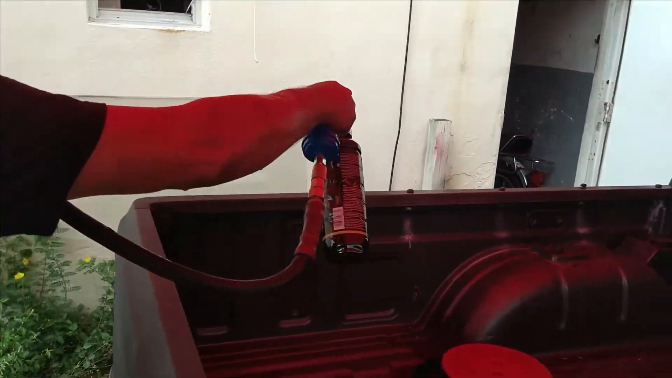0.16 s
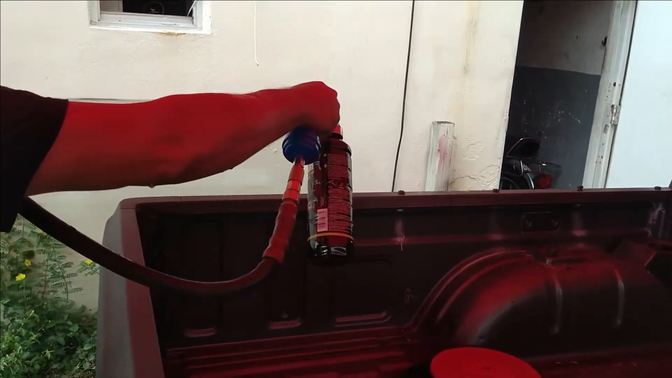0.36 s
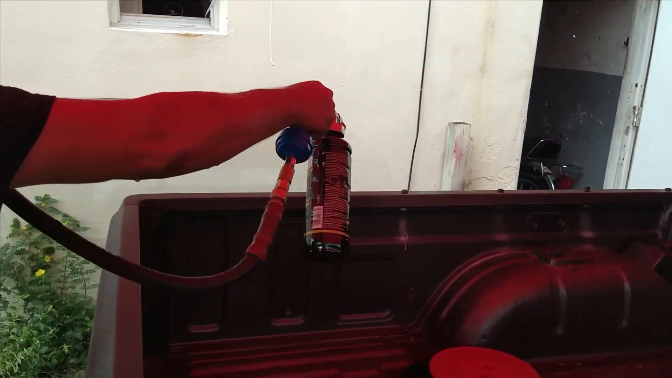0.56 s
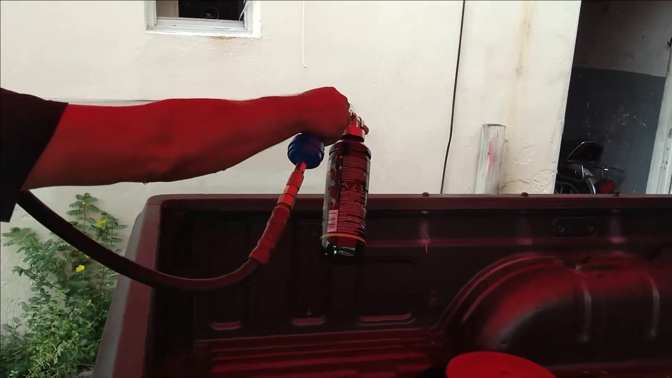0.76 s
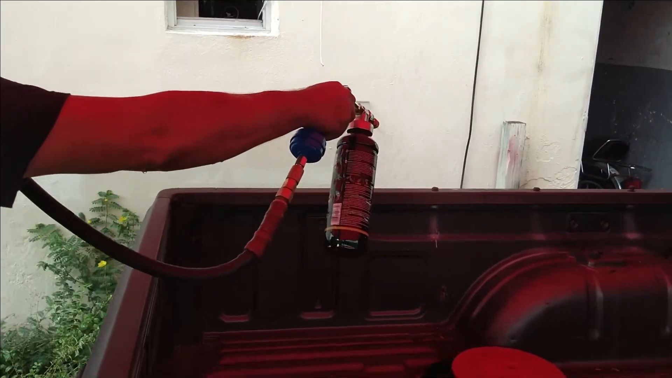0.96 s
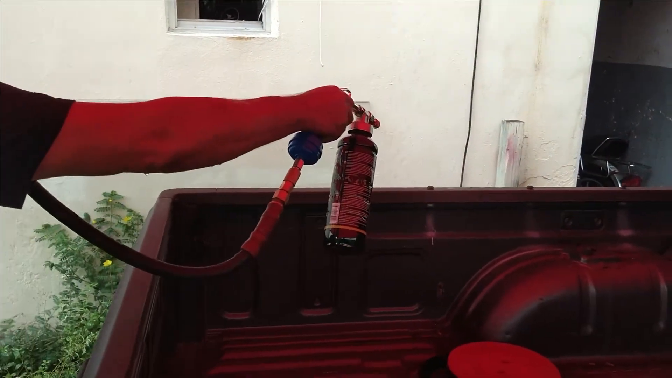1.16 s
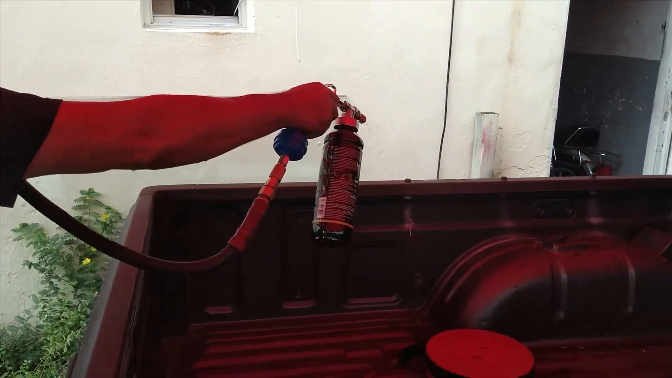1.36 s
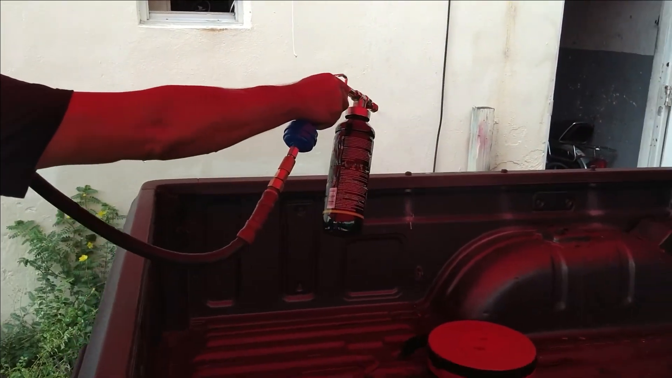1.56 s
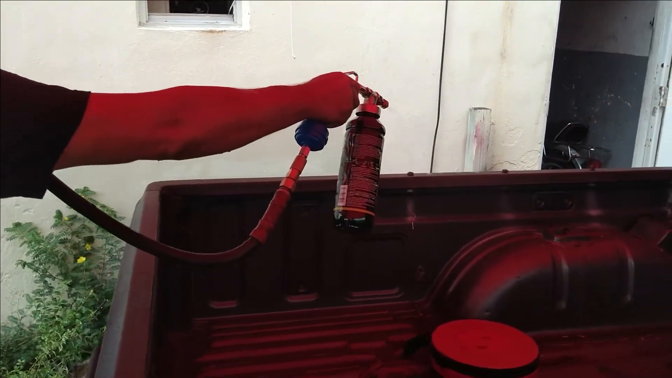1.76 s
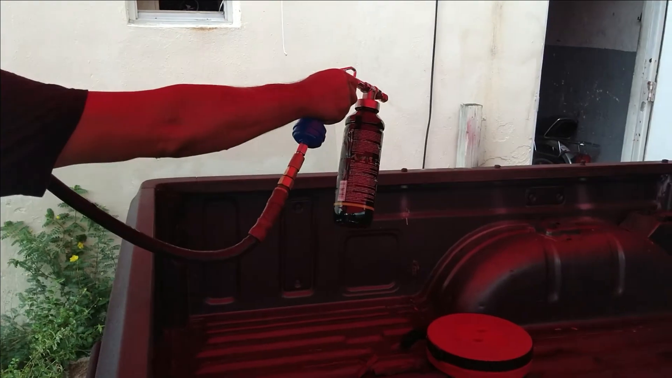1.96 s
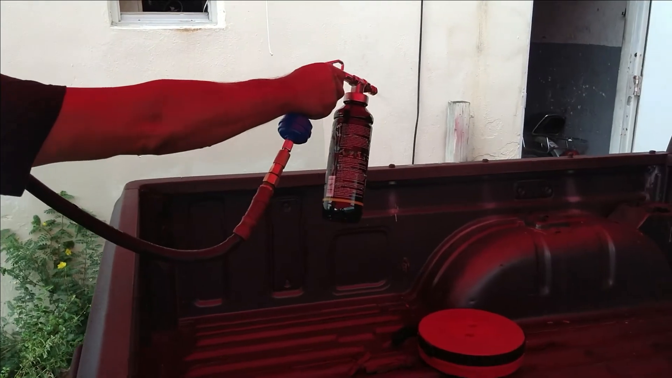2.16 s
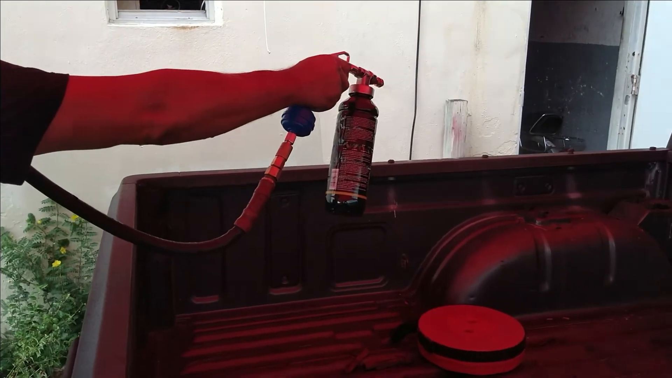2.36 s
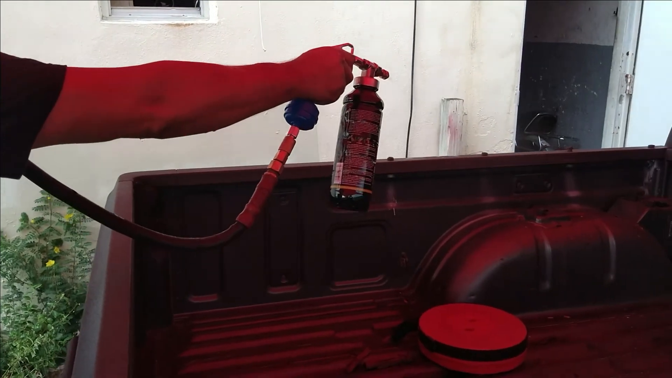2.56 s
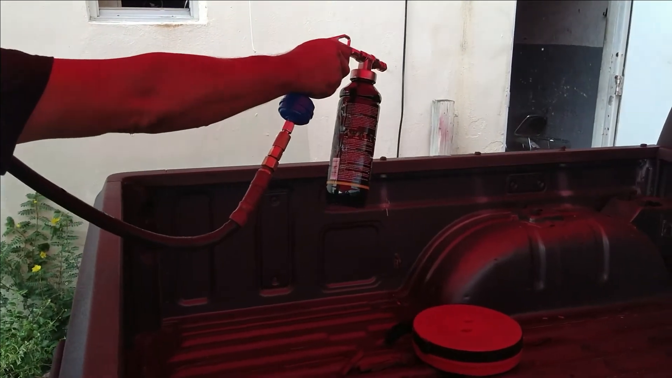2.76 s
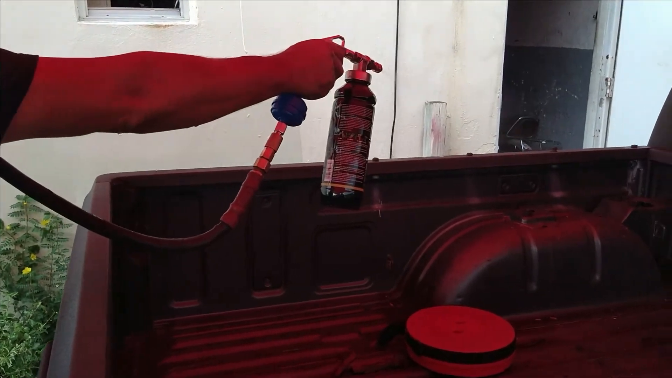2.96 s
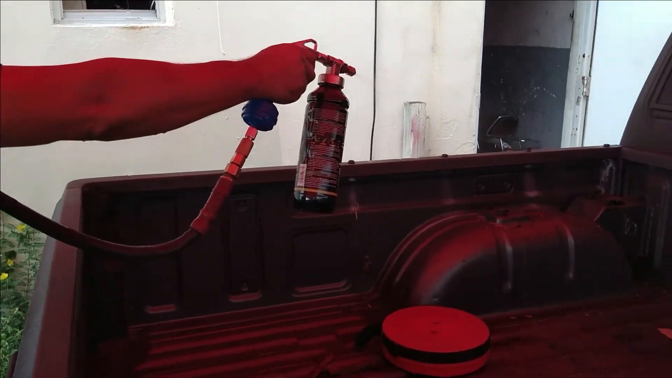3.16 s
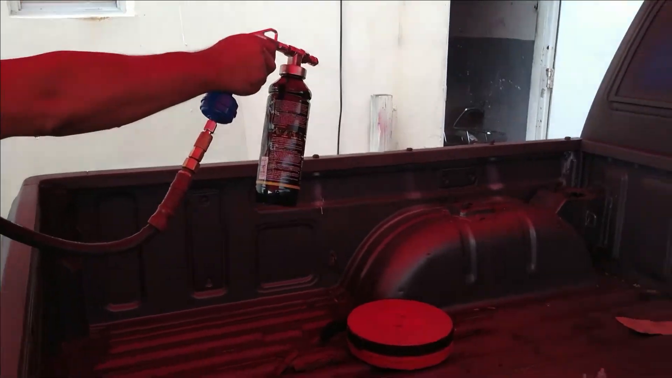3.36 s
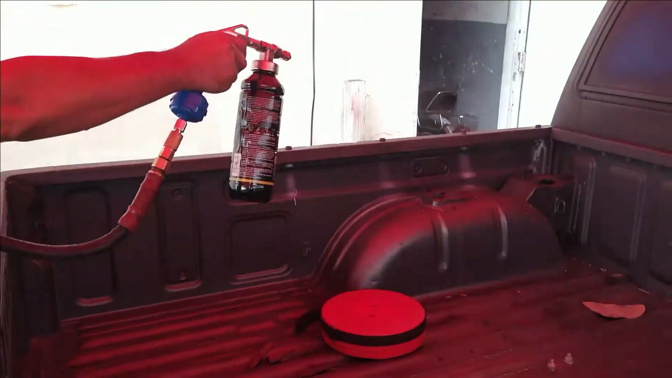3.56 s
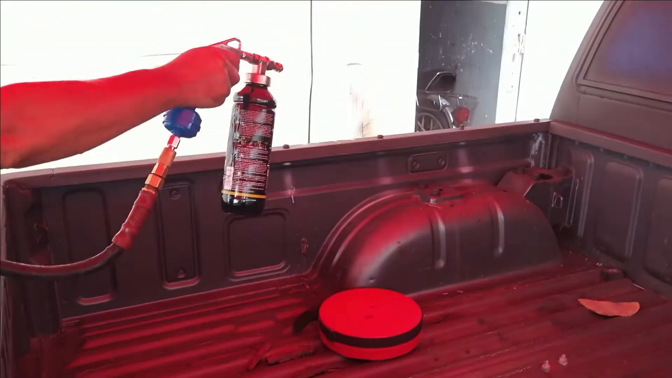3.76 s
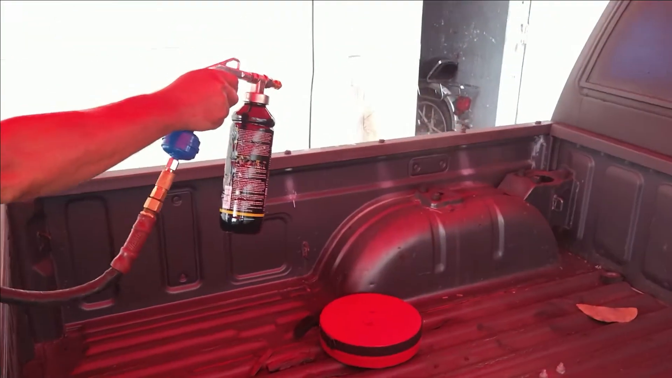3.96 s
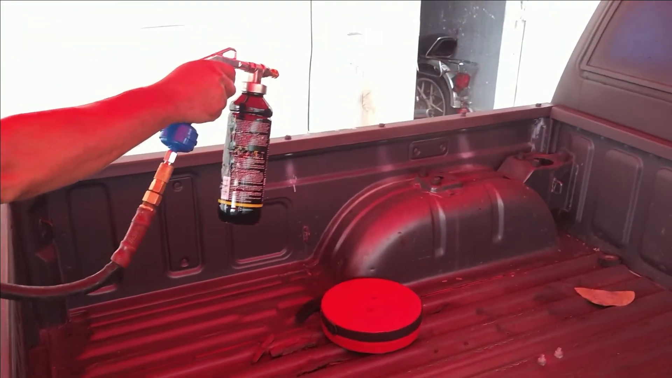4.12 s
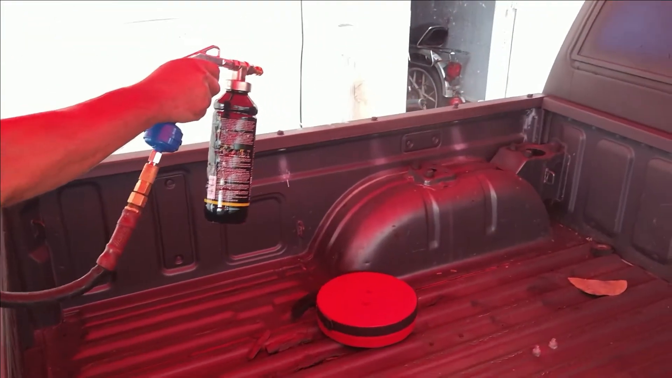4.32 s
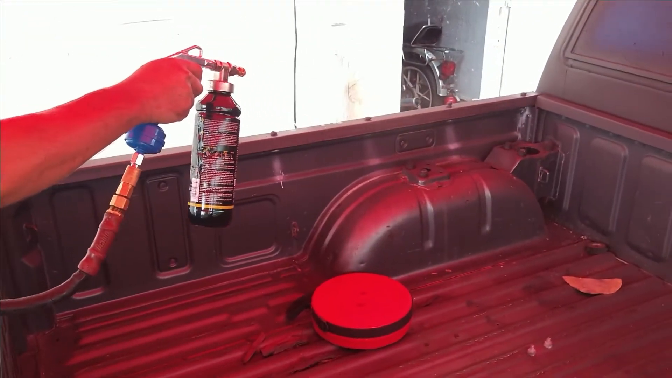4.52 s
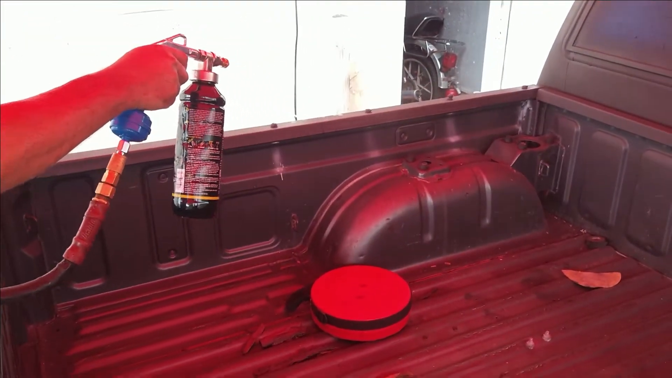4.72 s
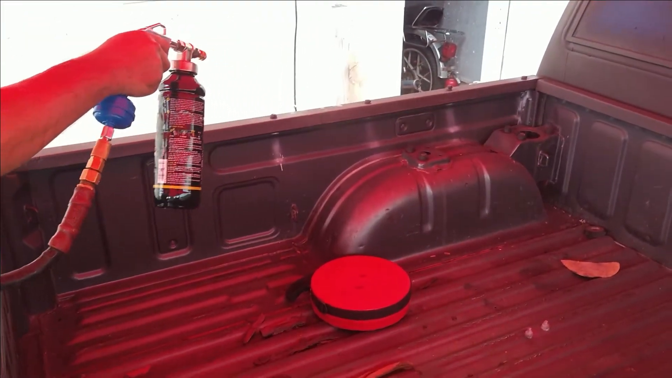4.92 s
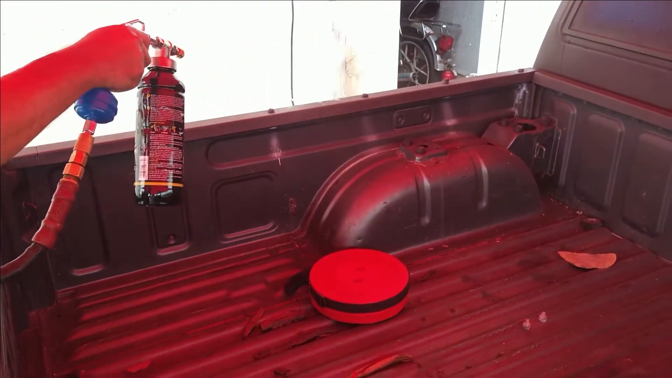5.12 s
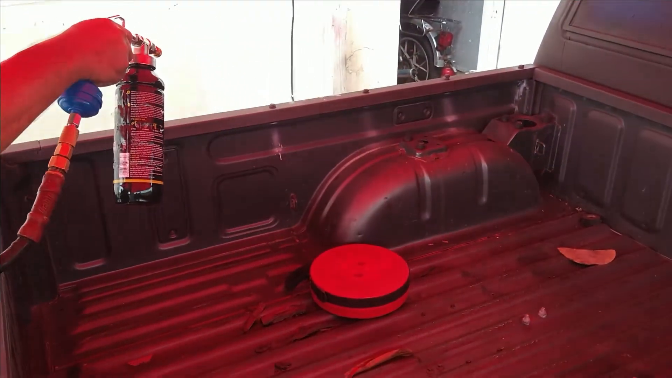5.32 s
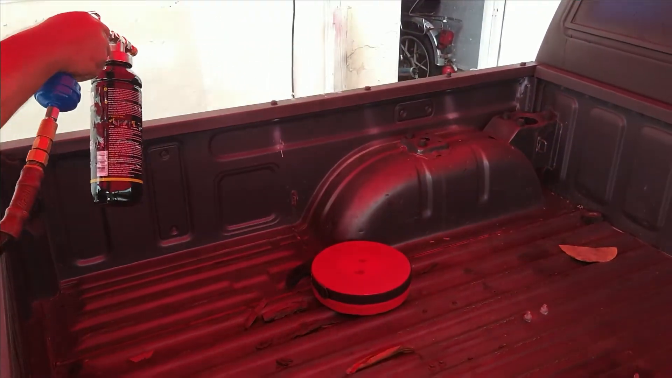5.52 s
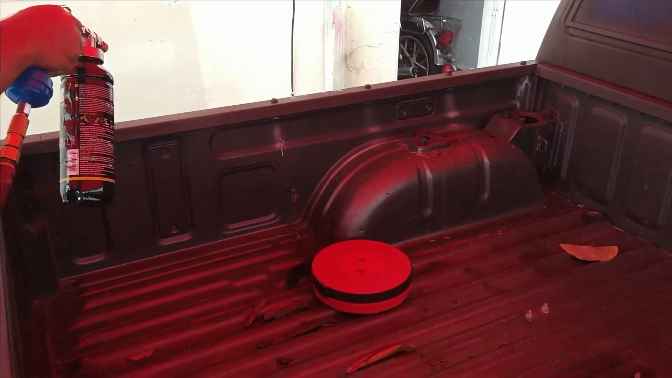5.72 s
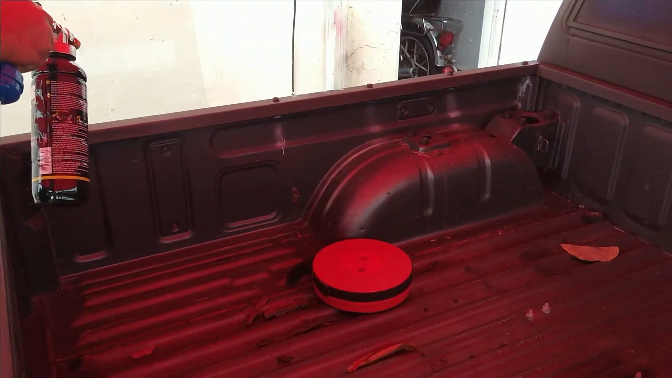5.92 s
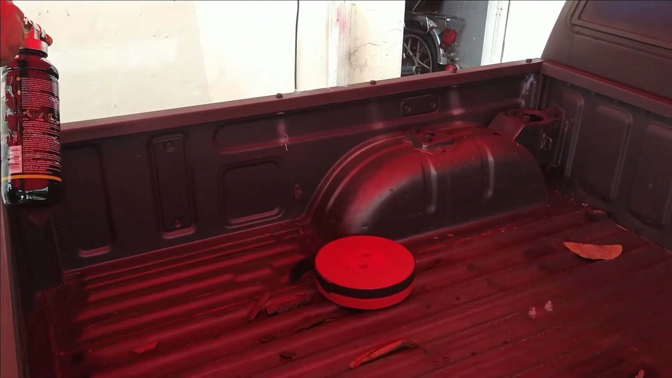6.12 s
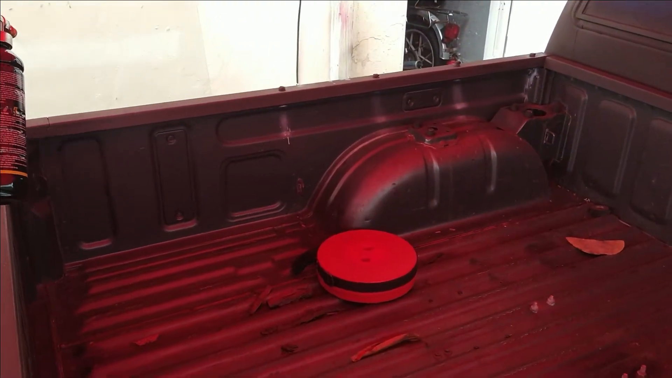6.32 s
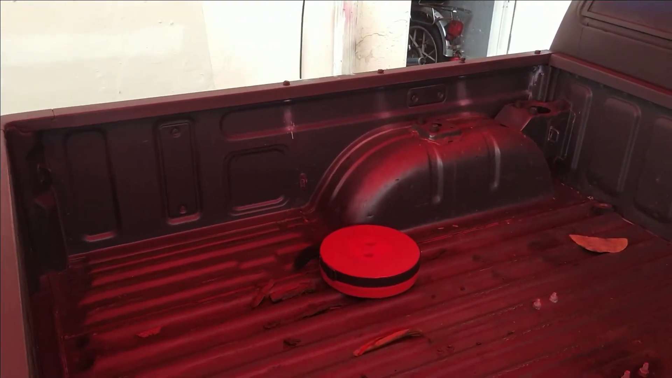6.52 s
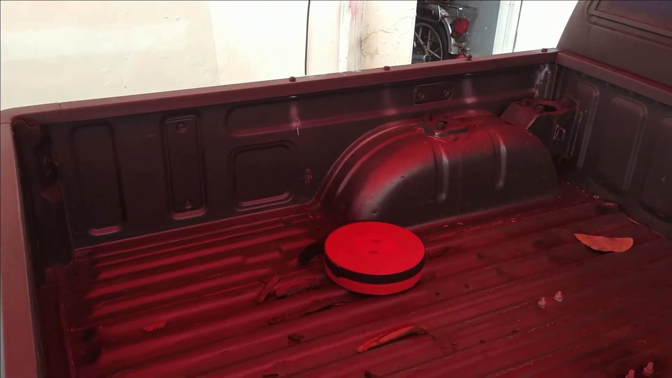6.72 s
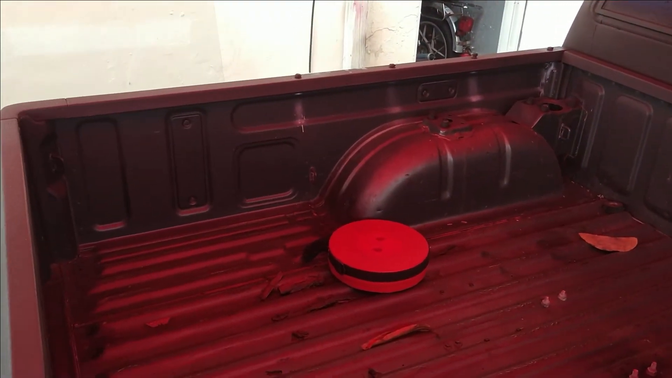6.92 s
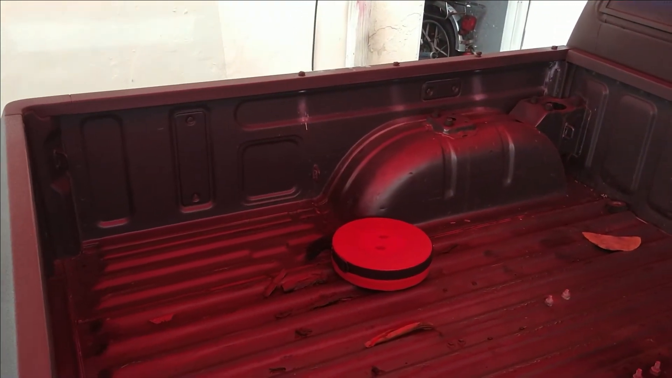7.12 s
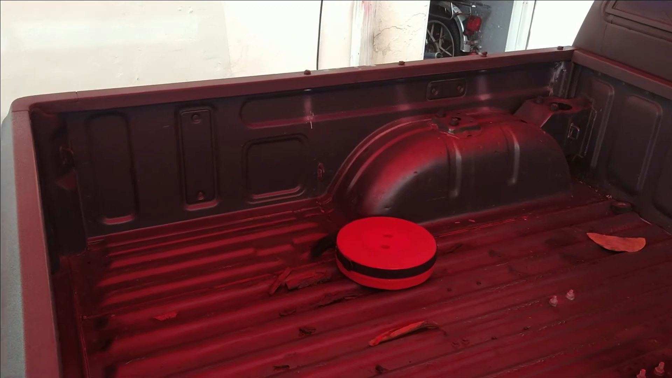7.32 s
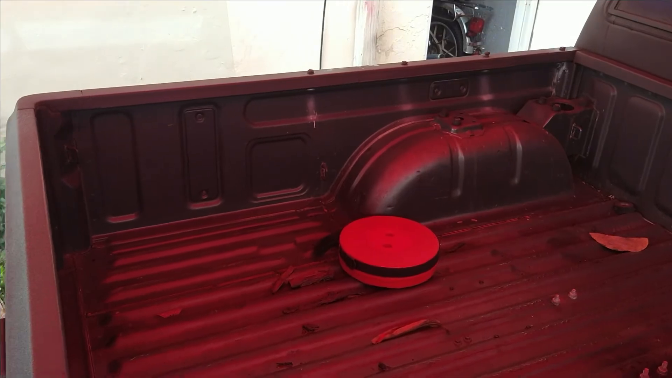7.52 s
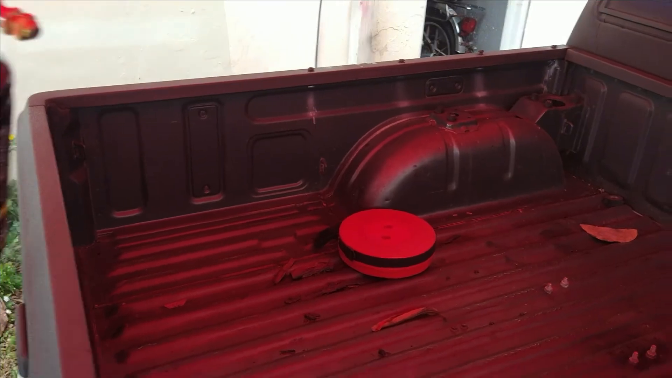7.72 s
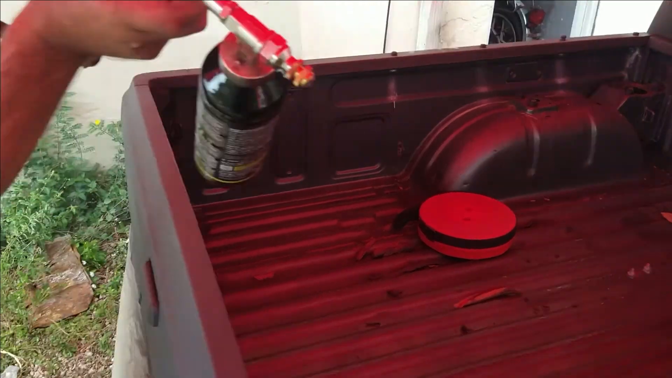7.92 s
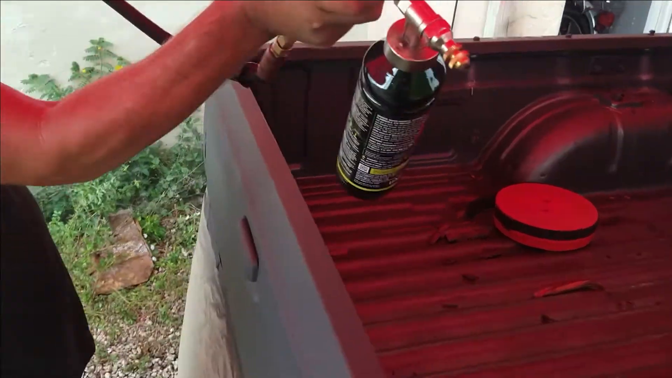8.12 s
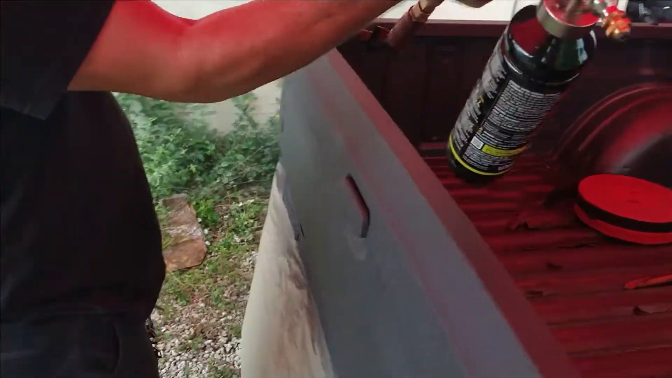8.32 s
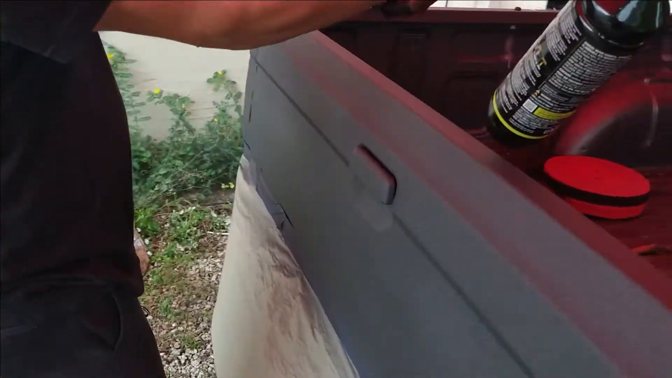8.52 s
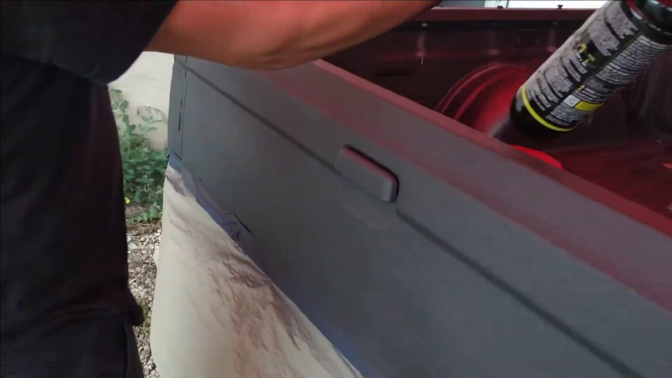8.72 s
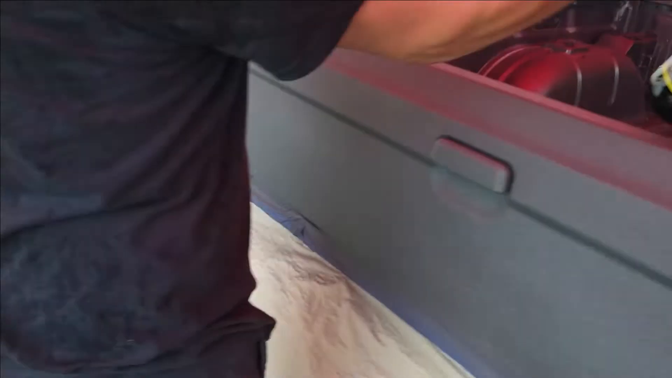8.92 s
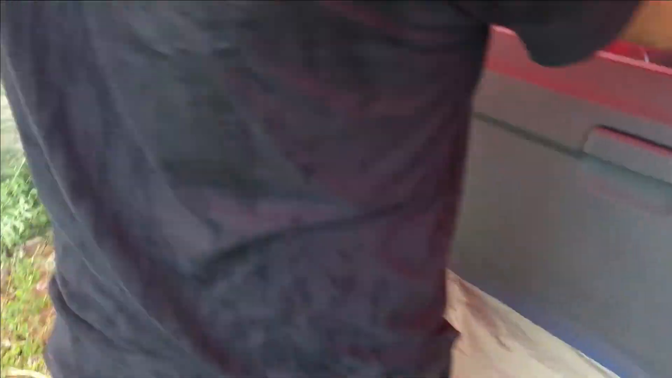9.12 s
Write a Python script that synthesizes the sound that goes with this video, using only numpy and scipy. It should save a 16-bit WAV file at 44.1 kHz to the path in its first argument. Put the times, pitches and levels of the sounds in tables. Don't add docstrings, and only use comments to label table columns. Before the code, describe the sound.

A loud, dense hiss of air fills most of the scene, fluttering slightly and ringing off metal panels and walls, with a high whistle wavering inside. The trigger is released and the pressure dies in a quick puff. A short pause reveals distant rain, a far machine's hum, bright soft splashes, a faint two-tone insect and a hand knock, before the air blasts again to the end. Nearby stereo pickup outdoors.

```python
import sys
import numpy as np
from scipy import signal
from scipy.io import wavfile
from scipy.ndimage import uniform_filter1d

SR = 44100
rng = np.random.default_rng(int(sys.argv[2]) if len(sys.argv) > 2 else 0)


def voltage_ratio(decibels):
    exponent = np.asarray(decibels, float) / 20
    return 10 ** exponent


def unload_wav(signal):
    wavfile.write(
        sys.argv[1],
        SR,
        np.round(np.clip(np.atleast_2d(signal).T, -1, 1) * 32767).astype(np.int16),
    )


N = 409248

# open t/s, let go t/s
PULLS = [
    (-1., 7.222),
    (8.6, 11.),
]
SHUT_S = .3
# t/s, air flow/dB, aim into the near corner/0-1, depth in the bed/dB, left-right turn/dB
GUN = [(0, -20.3, .9, -1, -1), (.6, -21, 1, -.5, 0), (1.5, -19.6, 1, 0, -.5), (1.95, -21, .9, 2, 1.5),
       (2.1, -21, .7, 1, 0), (2.22, -20.3, 0, -.5, -.5), (2.7, -19.9, 0, -1, 1), (3., -20.5, .1, -1, 2.5),
       (3.4, -20.7, 0, -.5, 0), (3.9, -20.9, 0, 0, 0), (4.5, -19.9, 0, 1, .3), (5.3, -20.5, -.1, .5, -.5),
       (5.7, -20.1, 0, 1, 0), (6.4, -20.3, 0, -1, -1), (7.2, -20.2, 0, -.5, -1),
       (8.65, -22.4, .1, -1.5, -2), (8.9, -21.6, 0, 1, -2), (9.28, -23, .9, -1, 1)]


def evened(x):
    return x / np.sqrt(np.mean(abs(x) ** 2) + 1e-20)


def read(points, hz):
    f, value = np.transpose(points)
    return np.interp(np.log(hz + 1), np.log(f + 1), value)


def columns(rows, t):
    s, *values = np.transpose(rows)
    return np.array([np.interp(t, s, v) for v in values])


def sides(pan_db):
    return np.array([pan_db / 2, -pan_db / 2])


def wander(t, low_hz, top_hz):
    steps = np.linspace(t[0], t[-1], 4000)
    drift = np.zeros(4000)
    for f, phase in zip(np.geomspace(low_hz, top_hz, 24), rng.random(24)):
        drift += np.sin(2 * np.pi * (f * steps + phase)) / np.sqrt(f)
    return evened(np.interp(t, steps, drift))


def swells(t, rows):
    return sum(db * np.exp(-((t - s) / width) ** 2) for s, db, width in rows)


def bump(hz, centre_hz, width):
    return 1 / (1 + (2 * (hz - centre_hz) / width) ** 2)


def noise_sheets():
    z = rng.standard_normal((N // 256 + 5, 513, 3, 2)) @ [1, 1j]
    return np.arange(len(z)) * 256 / SR, np.fft.rfftfreq(1024, 1 / SR)[:, None], z.T


def to_sound(z):
    return signal.istft(z, nperseg=1024, noverlap=768)[1][..., :N]


def flow(t):
    # t/s, level/dB
    opening = [
        (0, -63),
        (.008, -27),
        (.018, 0),
    ]
    # t/s, level/dB
    closing = [
        (0, 0),
        (.09, -29),
        (.128, -29),
        (.162, -40),
        (.3, -44),
    ]
    # t/s, change/dB, half width/s
    flow_changes = [(1.7, .6, .15), (2.87, -2, .04), (3.1, 1.3, .1), (3.3, -1.5, .08), (3.6, .8, .15),
                    (4.93, -1.2, .04), (6.225, -3, .015), (8.82, .8, .1)]
    pulls_db = []
    for start, end in PULLS:
        sealed_db = -60 * (t > end + SHUT_S + .1)
        pulls_db.append(columns(opening, t - start)[0] + columns(closing, t - end)[0] + sealed_db)
    return columns(GUN, t)[0] + swells(t, flow_changes) + np.max(pulls_db, 0)


def valve_air(t):
    closed, opened = PULLS[0][1] + SHUT_S, PULLS[1][0]
    valve = np.interp(t, [closed - .08, closed + .02, opened, opened + .002], [1, 0, 0, 1])
    spit = 1 + 2.5 * np.exp(-abs(t - opened) / .05)
    rough = evened(uniform_filter1d(rng.standard_normal(N), 150))
    sputter_db = 0.38 * wander(t, 5, 60) + .7 * spit * rough
    flutter_db = .3 * wander(t, 1.5, 10)
    return voltage_ratio(flow(t) + flutter_db + sputter_db + 2.0) * valve


def whistle(t, hz, waver_db):
    # t/s, f/Hz, level/dB
    cavity = [
        [(0.0, 5850, 6), (1.65, 5740, 8), (1.98, 5730, 7.5), (4.86, 5670, 10.5), (5.42, 5900, 7.5),
         (5.79, 5500, 7), (6.35, 5880, 8), (7.4, 5920, 10)],
        [(8.62, 5470, 9), (9.28, 5640, 8)],
    ]
    centre_hz, level_db = columns(np.concatenate(cavity), t)
    centre_hz = centre_hz + 90 * wander(t, 1, 10)
    return (level_db + 1.5 * waver_db) * bump(hz, centre_hz, 750)


def port_colour(t, hz):
    # from t/s, to t/s, f/Hz, width/Hz, change/dB
    shared_changes = [(.5, 2.1, 2280, 300, 4.5), (-1, 3.4, 750, 170, 9), (1, 3.8, 1720, 230, 4),
                      (-1, 1.3, 2230, 200, 3), (5.5, 9.6, 1394, 120, 2.5), (.9, 9.6, 3750, 1100, 5),
                      (8.66, 8.95, 900, 500, 6), (8.6, 8.95, 5000, 900, 3), (8.95, 9.4, 950, 400, -1)]
    # from t/s, to t/s, f/Hz, width/Hz, change/dB
    left_changes = [(-1, 2.15, 1950, 200, 7), (-1, 1.1, 1650, 400, 8), (1.1, 2.15, 1550, 300, 5),
                    (5, 8.8, 435, 64, 13), (8.5, 9, 780, 200, 12.5), (-1, 9.6, 2650, 800, 3),
                    (3.5, 8.7, 940, 80, 5), (8.72, 8.92, 3900, 400, 5), (8.68, 8.95, 1900, 1200, 3),
                    (2.2, 4, 1500, 300, 3), (-1, 7.3, 7600, 1500, 1.5)]
    # from t/s, to t/s, f/Hz, width/Hz, change/dB
    right_changes = [(1.8, 3.4, 2240, 100, 7), (3, 6.2, 2070, 220, 6.5), (-1, .82, 5800, 150, 5),
                     (8.68, 8.95, 5520, 200, 7), (4.9, 8.68, 4500, 900, 2), (-1, 9.6, 1200, 220, 4.5),
                     (.9, 7.3, 3090, 560, -3), (8.6, 9.6, 3400, 700, -5), (-1, 1.3, 1750, 300, -3),
                     (3, 7.3, 1040, 120, -3), (2.2, 7.5, 850, 350, -3), (8.9, 9.6, 1500, 250, -4),
                     (3.5, 6.2, 2500, 300, 2)]
    far_port = .2
    groups = (left_changes, [1, far_port]), (right_changes, [far_port, 1]), (shared_changes, [1, 1])
    lift_db = np.zeros((2, len(hz), len(t)))
    for rows, ports in groups:
        ring_db = 0
        for start, end, centre_hz, width, db in rows:
            aimed = np.interp(t, [start - .1, start + .05, end - .05, end + .083], [0, 1, 1, 0])
            ring_db = ring_db + db * bump(hz, centre_hz, width) * aimed
        lift_db += np.reshape(ports, (2, 1, 1)) * ring_db
    return lift_db


def band_lift(t, hz, shape_db, waver_db):
    # low edge f/Hz, high edge f/Hz
    bands = [
        (1100, 2800),
        (3200, 4500),
        (4600, 7000),
        (8000, 15500),
    ]
    # level over the flow/dB, left-right/dB, corner gain/dB, corner left-right/dB,
    # share of depth/0-1
    voices = [
        (-8.2, -1.6, 2.3, 8, 1),
        (-4.8, -2.5, -1.3, 1.2, .3),
        (0, -2.6, 0, -1.6, 0),
        (-2.6, -.7, 0, 1.5, .1),
    ]
    turn_share = [.3, .4, 1, .2]
    _, corner, depth_db, turn_db = columns(GUN, t)
    db, pan, corner_db, corner_pan, deep = np.transpose(voices)[..., None]
    power = voltage_ratio(2 * shape_db)
    f = hz[:, 0]
    band_db = [10 * np.log10(power[:, (f > lo) & (f < hi)].sum(1)) for lo, hi in bands]
    lift_db = db + corner * corner_db + deep * depth_db - np.stack(band_db, 1)
    weak_db = .22 * np.minimum(flow(t) + 27, 0)
    lift_db = lift_db + np.array([weak_db, weak_db, .5 * waver_db, .2 * weak_db])
    sway_db = .9 * np.array([wander(t, 1, 12) for _ in bands])
    lift_db = lift_db + sides(pan + corner * corner_pan + np.outer(turn_share, turn_db) + sway_db)
    centres = np.log(np.prod(bands, axis=1)) / 2
    blend = np.array([np.interp(np.log(f + 1), centres, row) for row in np.eye(4)]).T
    return blend @ lift_db


def walls(t, hz):
    delays = .011 * rng.random(12) + .0015
    paths = 0
    for d in delays:
        drifting = d + .00003 * wander(t, 0.053, 0.508)[::4]
        paths = paths + np.exp(-2j * np.pi * hz * drifting)
    echo = voltage_ratio(-0.53 - hz / 6500.0)
    comb = (1 + echo * paths / np.sqrt(12)) / np.sqrt(1 + echo ** 2)
    return np.repeat(comb, 4, axis=1)[:, :len(t)]


def jet():
    # f/Hz, level/dB per Hz
    jet_colour = [(200, -54.5), (400, -26), (800, -21.5), (1200, -15.5), (1700, -10), (2600, -9),
                  (3200, -8.5), (4600, -7), (7000, -6), (9000, -7.5), (12000, -9), (15800, -9.5)]
    # t/s, left lags right/samples, share common to both ports/0-1,
    # bounce off the bed floor/ratio, low edge f/Hz
    direct_path = [(0, 5.5, 0.69, -.6, 1040), (2.1, 2, 0.66, -0.65, 1030), (2.3, 2, 0.67, -.5, 960),
                   (4, -2.5, 0.68, -0.25, 875), (6, -6, 0.7, -0.47, 910), (6.5, -9, 0.63, -0.3, 880),
                   (7.5, -11.5, .9, 0.053, 874), (8.5, 8.5, 1, -0.13, 1400), (8.9, 11, 0.81, -0.34, 1500),
                   (9.28, 19, 0.72, -0.15, 1390)]
    # t/s, change/dB, half width/s
    sings = [
        (1.03, 2.5, .1),
        (4.3, 1.5, .1),
        (4.7, 1, .15),
        (5.35, -1, .15),
        (8.8, 1, .1),
    ]
    t, hz, (common, *own) = noise_sheets()
    lag, share, bounce, low_hz = columns(direct_path, t)
    waver_db = .7 * wander(t, 1, 12) + 2 * swells(t, sings)
    shape_db = read(jet_colour, hz) + port_colour(t, hz) + whistle(t, hz, waver_db)
    shape_db = shape_db - 8. / (1 + np.exp((hz - low_hz) / 45.).clip(max=1e9))
    level_db = shape_db + band_lift(t, hz, shape_db, waver_db)

    share = np.clip(share * np.exp(-hz / 20000), 0, 1)
    delay = np.exp(-1j * np.pi * hz * lag / SR)
    floor = (1 + bounce * np.exp(-2j * np.pi * hz * 0.000544)) / np.sqrt(1 + bounce ** 2)
    ports = []
    for path, own_noise in zip((delay * floor, 1 / delay), own):
        direct = np.sqrt(share) * common * path + np.sqrt(1 - share) * own_noise
        ports.append(direct * walls(t, hz))
    unit = np.sqrt(np.mean(to_sound(common) ** 2) / len(hz))
    return to_sound(voltage_ratio(level_db) * ports) / unit * valve_air(np.arange(N) / SR)


def rain():
    # f/Hz, level/dB per Hz
    rain_colour = [(20, -53), (45, -39.5), (66, -11.5), (123, -5), (260, -13), (500, -14), (900, -19.5),
                   (2650, -23.5), (2950, -31), (4200, -30.5), (6300, -30), (7200, -36.5), (11000, -41.5),
                   (13500, -48), (16000, -47)]
    # f/Hz, likeness/-1 to 1
    likeness = [(60, 1), (180, 0.72), (550, 0.71), (1650, -0.19), (4970, -0.072), (15000, 0.063)]
    # f/Hz, left-right/dB
    rain_side = [(60, 0.5), (130, 2.5), (290, 2), (640, 3), (1410, -0.5), (3100, -6), (6820, -6.5),
                 (15000, -2)]
    # t/s, change/dB, half width/s
    gusts = [
        (8.0, 2, .05),
        (8.3, 5, .06),
        (8.55, -2, .1),
    ]
    t, hz, (a, b, patches) = noise_sheets()
    patches = evened(uniform_filter1d(uniform_filter1d(patches.real, 10, 0), 12, 1))
    same = np.clip(read(likeness, hz), -1, 1)
    colour_db = read(rain_colour, hz)
    linger_db = 10 * np.exp(-np.maximum(t - PULLS[0][1] - .18, 0) / .3)
    middle = np.exp(-(np.log(hz / 1700 + 1e-3) / 0.92) ** 2)
    middle_db = linger_db + swells(t, gusts) + .6 + sides(np.full((1, 1), -2.7))
    gain_db = colour_db + sides(read(rain_side, hz)) + 1.16 * patches + middle * middle_db
    scale = voltage_ratio(-47 - 1.9) / np.sqrt(np.mean(to_sound(voltage_ratio(colour_db) * a) ** 2))
    return scale * to_sound(voltage_ratio(gain_db) * np.array([a, same * a + np.sqrt(1 - same ** 2) * b]))


def wavering_tone(hz, width):
    r = np.exp(-np.pi * width / SR)
    slow = signal.lfilter([1], [1, -2 * r, r * r], rng.standard_normal((N, 2)) @ [1, 1j])
    return evened((slow * np.exp(2j * np.pi * hz * np.arange(N) / SR)).real)


def hum():
    # f/Hz, width/Hz, level/dB
    hum_tones = [
        (116, 9.7, -58),
        (225, 9.1, -66),
        (261, 5.4, -61.5),
        (80, 5.5, -62),
    ]
    # t/s, change/dB, half width/s
    rumble = [
        (.3, 3, .6),
        (2.3, 4, .06),
        (5.19, -8, .05),
        (7.1, 3, .25),
        (7.7, 5, .05),
        (9.1, -3, .05),
    ]
    t = np.arange(N) / SR
    swell_db = swells(t, rumble) + 1.5 * wander(t, .5, 6) + .1
    tones = sum(voltage_ratio(db) * wavering_tone(hz, width) for hz, width, db in hum_tones)
    return tones * voltage_ratio(swell_db + sides(np.array([1.6])))


def drips():
    # t/s, peak level/dB, pitch f/Hz, left-right/dB
    splashes = [
        (7.5994, -46, 5560, -6),
        (7.7594, -53, 6270, -4.0),
        (7.9094, -50, 6140, -4.0),
        (8.0194, -50, 6300, -2),
        (8.1694, -52, 5900, -5.0),
        (8.3205, -47, 6490, -5.5),
        (8.5091, -46, 7380, -3.0),
        (8.5824, -58, 5330, -10),
    ]
    out, t = np.zeros((2, N)), np.arange(2200) / SR
    for (s, db, hz, pan), noise in zip(splashes, rng.standard_normal((len(splashes), 2, 2200))):
        band = signal.butter(2, [.8 * hz, 1.45 * hz], "band", fs=SR, output="sos")
        splash = evened(signal.sosfilt(band, noise))
        swell = np.minimum(t / 0.0026, 1) * voltage_ratio(db - 9. - 60 * t / 0.085 + sides(np.array([pan])))
        out[:, round(s * SR):][:, :2200] += swell * splash
    return out


def insect():
    # from t/s, to t/s, upper tone level/dB, lower tone level/dB
    chirps = [
        (7.83, 7.92, -66, -67),
        (7.92, 8.17, -60, -66),
        (8.19, 8.27, -65, -67),
    ]
    insect_hz = 2603, 2490
    t = np.arange(N) / SR
    loudness = np.zeros((2, N))
    for start, end, *db in chirps:
        fade = np.interp(t, [start - .04, start + .04, end - .04, end + .05], [0, 1, 1, 0])
        loudness += fade * voltage_ratio(np.array(db))[:, None]
    tones = np.zeros(N)
    for hz, level in zip(insect_hz, loudness):
        throb = voltage_ratio(2.2 * wander(t, 8, 25))
        tones += level * throb * np.sin(2 * np.pi * hz * t + .6 * wander(t, 3, 25))
    return tones * voltage_ratio(np.array([[-1.], [5.5]]))


def knocks():
    # t/s, peak level/dB, top f/Hz, length/s
    touches = [
        (8.262, -53, 1200, .09),
        (8.93, -44, 130, .09),
        (8.623, -34, 1300, 0.025),
    ]
    out = np.zeros(N)
    for (s, db, hz, length), noise in zip(touches, rng.standard_normal((len(touches), 5000))):
        puff = signal.lfilter(*signal.butter(2, [55, hz], "band", fs=SR), noise)[:round(length * SR)]
        out[round(s * SR):][:len(puff)] += voltage_ratio(db) * evened(puff) * np.hanning(len(puff))
    return out


def scene():
    return jet() + rain() + hum() + drips() + insect() + knocks()


def roll_off(x):
    return signal.sosfilt(signal.butter(12, 15830, fs=SR, output="sos"), x)


def record(dry):
    knee = .8
    over = np.maximum(abs(dry) - knee, 0)
    room = (1 - knee) * .8
    squeezed = dry - np.sign(dry) * (over - room * np.tanh(over / room))
    low_pass = signal.firwin(1023, 15850, window=("kaiser", 9), fs=SR)
    limited = signal.oaconvolve(squeezed, low_pass[None], "same")
    return roll_off(limited)


dry = scene()
out = record(dry)
unload_wav(out)
```